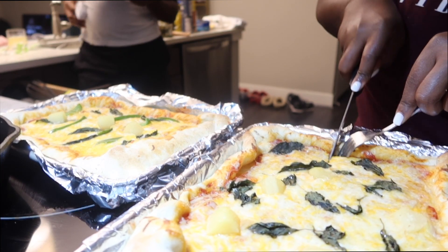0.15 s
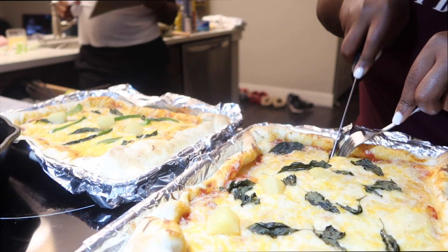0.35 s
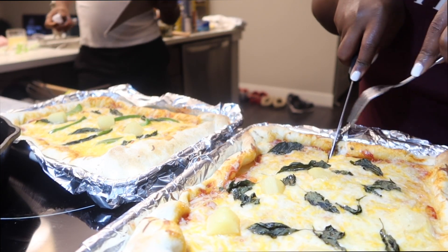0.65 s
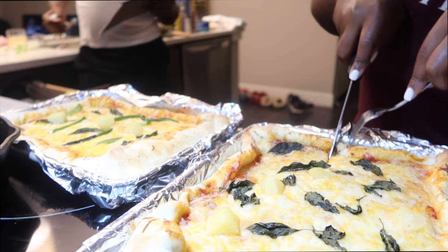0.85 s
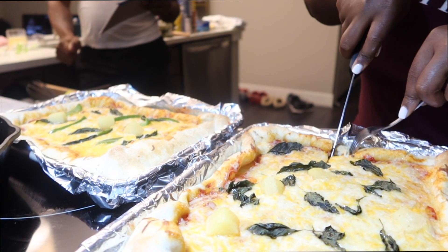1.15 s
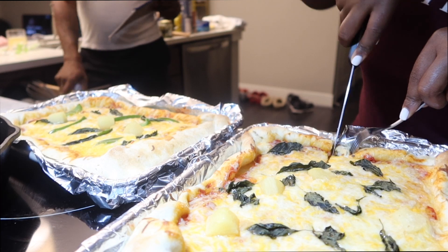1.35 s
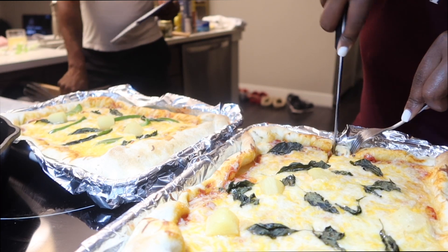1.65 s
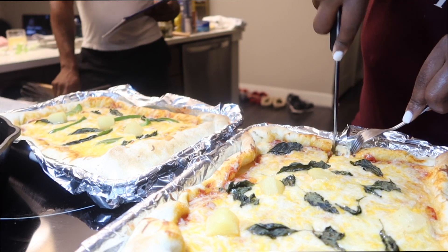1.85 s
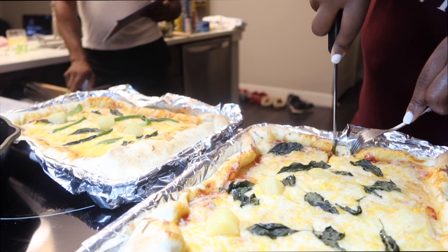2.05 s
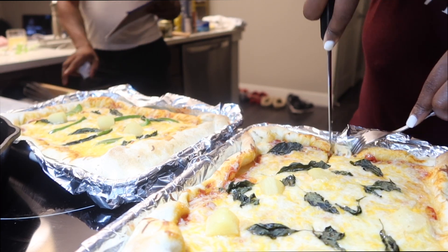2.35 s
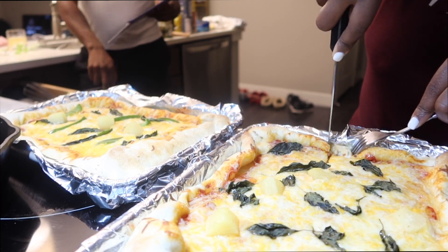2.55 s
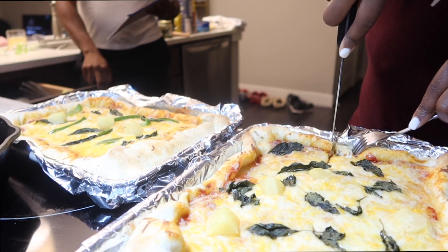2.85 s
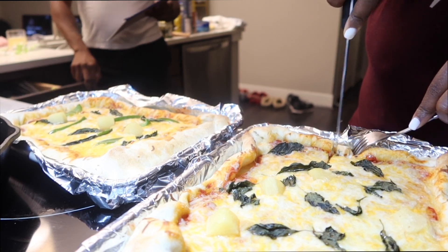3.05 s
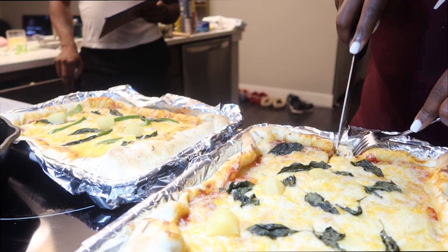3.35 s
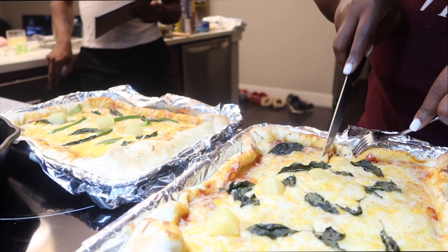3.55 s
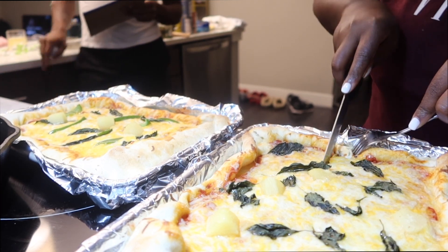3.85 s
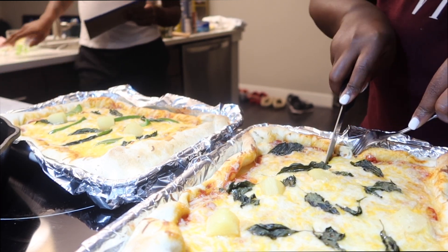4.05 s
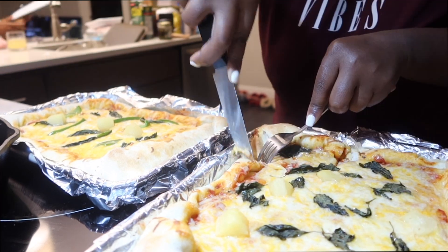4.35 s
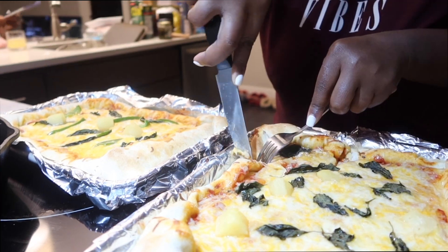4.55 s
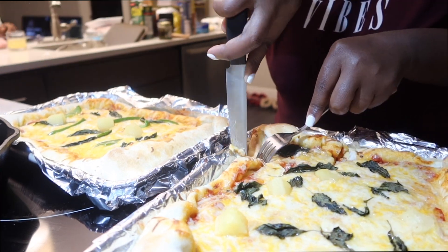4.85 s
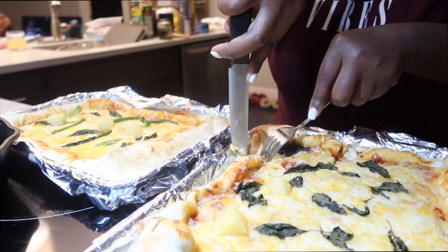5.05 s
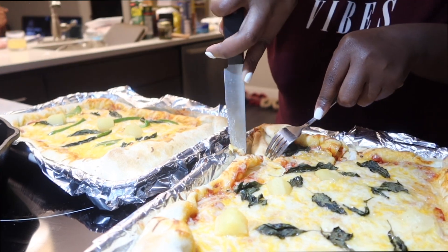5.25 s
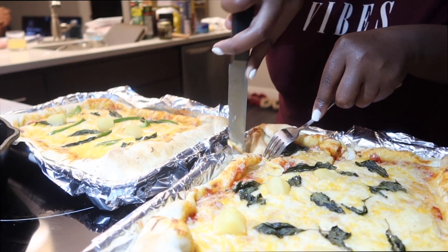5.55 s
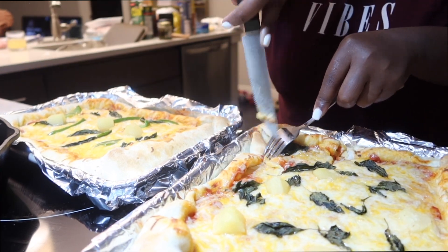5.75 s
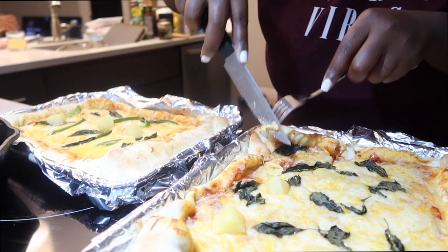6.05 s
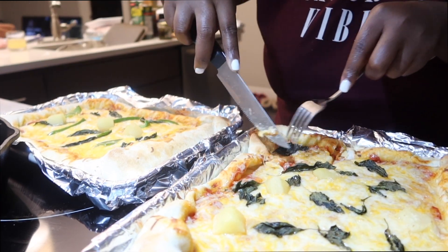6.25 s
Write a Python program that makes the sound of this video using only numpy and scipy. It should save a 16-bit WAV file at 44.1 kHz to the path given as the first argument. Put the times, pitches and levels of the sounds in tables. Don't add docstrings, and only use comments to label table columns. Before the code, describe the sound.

Close foil rustling and sharp snapping with cutlery scrapes and dull metal pan thuds, thinning to sparse clicks over a faint fridge hum.

```python
import sys
import numpy as np
from scipy import signal
from scipy.fft import rfft, irfft, next_fast_len
from scipy.io import wavfile

SR = 44100
rng = np.random.default_rng(int(sys.argv[2]) if len(sys.argv) > 2 else 0)


def invert_db(x):
    u = np.asarray(x, float) / 20
    return 10 ** u


def master_out(mix):
    frames = np.transpose(np.atleast_2d(mix))
    ceiling = np.clip(frames, -1, 1)
    pcm = np.round(ceiling * 32767).astype(np.int16)
    wavfile.write(sys.argv[1], SR, pcm)


N = 282681

# time [s], rustle level [dB], crispness [dB].
HAND_PRESSURE = [(0.0, -40, -9), (0.27, -26.5, -12.5), (0.5, -32, -13), (0.7, -36, -9.5), (0.9, -43, -3.5),
                 (1.05, -33.5, -11.5), (1.2, -56, -2), (1.5, -42, -10), (2.1, -52, -1), (2.43, -53, -14),
                 (2.6, -44, -8), (2.9, -56, -10), (3.4, -46, -17), (4.7, -53, -11), (5.01, -46.5, -13.5),
                 (5.2, -65, -5), (6.05, -56, -10), (6.41, -80, 8)]
# peak time [s], swell [s], fade [s], level [dB], brightness [dB].
STROKES = [(1.364, 0.029, 0.098, -31, -11.5), (1.51, 0.13, 0.034, -30.5, -23),
           (1.596, 0.026, 0.037, -22.5, -11), (1.724, 0.027, 0.045, -23, -10.5),
           (1.79, 0.011, 0.065, -32.5, -7), (1.951, 0.082, 0.0089, -15, -16.5),
           (2.044, 0.042, 0.013, -16, -17), (3.847, 0.09, 0.24, -27.5, -26), (4.242, 0.072, 0.095, -33, -6),
           (4.297, 0.071, 0.061, -25.5, -16), (4.349, 0.17, 0.006, -35, -9.5),
           (5.645, 0.028, 0.066, -39, -21), (5.693, 0.17, 0.02, -26.5, -15.5), (6.15, 0.21, 0.061, -54, 1)]
# start [s], peak level [dB], pitch [Hz], brightness [dB].
CLICKS = [(.088, -23, 3140, -10), (.111, -20, 4970, -10), (.192, -21, 4530, -17), (.422, -16, 4930, -20),
          (.448, -25, 6100, -15), (.594, -28, 4600, -15), (.607, -20.5, 4500, -15), (.667, -18, 4500, -15),
          (.674, -19, 5050, -15), (.782, -27, 4950, -10), (.798, -24, 5000, -10), (4.809, -38, 5060, -5),
          (6.087, -25, 4070, -14), (6.125, -33, 4900, -7), (6.158, -34, 2940, -12),
          (.153, -10.5, 2500, -25), (.278, -9.5, 2860, -25), (.367, -18, 3450, -10),
          (.431, -6.5, 1970, -15), (.49, -15, 2180, -25), (.537, -31, 1890, -17), (.561, -18, 2400, -20),
          (.61, -19, 2360, -20), (.721, -16, 2350, -20), (.847, -36, 1900, -12), (1.941, -6, 2070, -18),
          (2.045, -10, 2220, -15), (4.217, -28, 3020, 8), (4.352, -31, 2950, 0), (4.787, -29, 1680, -20),
          (5.056, -36, 1900, -20), (5.208, -36.5, 2000, -20), (5.282, -42, 1200, -25),
          (5.583, -32, 1890, 1), (5.65, -23, 2260, -10)]
TICKS = [(.189, -13.5, 2330, -18), (.224, -4.5, 2870, -16), (.802, -13.5, 3020, -23),
         (.907, -8.5, 1100, -33), (1.393, -15, 2020, -24), (1.511, -13, 1850, -28),
         (1.576, -17.5, 1950, -20), (1.593, -14, 2050, -11), (1.725, -12, 1800, -9), (1.745, -18, 2350, -4),
         (1.795, -12, 1850, -27), (1.816, -6, 2240, -28), (1.894, -17, 1900, 12.5), (1.919, -5, 1930, -29),
         (2.022, -17, 1640, -13), (2.17, -6, 2170, -1), (2.359, -25.5, 1530, 1), (2.373, -16.5, 1950, 4),
         (2.396, -20.5, 1960, -3), (2.697, -19.5, 1860, 5), (2.704, -13, 2040, -33),
         (2.747, -24.5, 2070, -29), (4.34, -13.5, 2940, -20), (4.75, -45, 2060, 19.5),
         (5.349, -38.5, 2870, 8), (.783, -20, 2560, -5), (.93, -27, 2490, 19), (1.01, -24, 2500, -16),
         (5.868, -50, 1920, 18), (5.719, -26, 2740, 15)]
POPS = [(.081, -18.5, 1780, -1.5), (.295, -5.5, 1880, -33), (.49, -15, 2270, -29), (.722, -14, 2700, -5),
        (.819, -31, 2840, 15.5), (.872, -18, 1310, -26), (.979, -12.5, 3150, -10),
        (1.034, -15.5, 2770, -27), (1.214, -25, 1530, -17), (1.69, -12.5, 1930, -6.5),
        (1.785, -14, 1940, -22), (1.94, -8, 2100, -17), (2.043, -23, 2600, -22), (2.587, -17, 2220, -3),
        (2.633, -16.5, 2750, -8), (3.819, -27, 1070, 0), (3.846, -14, 2090, -12), (4.181, -20.5, 2540, -7),
        (4.233, -14, 2880, 2), (4.439, -15.5, 1460, -38), (5.118, -26, 2020, -8), (5.129, -21, 3080, 0.5),
        (5.164, -22, 2950, -16), (5.367, -34, 2470, -10), (5.576, -20.5, 2080, -4), (5.599, -26, 2110, -8),
        (5.693, -7.5, 2360, -2), (6.061, -7, 2100, 4.5), (6.11, -24, 2160, -28), (6.139, -33, 2980, -16)]
SNAPS = [(.058, -23, 2410, -19), (.108, -26, 2960, 1), (.156, -15, 2500, -31), (.281, -11, 2700, -32),
         (.413, -5, 2220, -12), (.431, -14.5, 1940, 4), (.466, -14.5, 2380, -1.5), (.611, -15.5, 2300, -3),
         (.666, -16.5, 2440, -4), (.906, -6.5, 1630, -1), (.998, -25, 1530, 8), (1.3, -22, 2000, -3),
         (1.491, -14.5, 1800, -0.5), (1.851, -10.5, 1680, -32), (2.148, -15.5, 1870, -8),
         (2.411, -21, 1940, 1.5), (2.939, -20, 1880, -6), (3.193, -26, 2510, -20), (3.805, -36, 2240, -28),
         (4.424, -45.5, 904, 16), (4.849, -16, 1990, -8), (4.958, -23.5, 1780, -31),
         (5.958, -27.5, 1960, -6)]
CRUMPLES = [(.561, -13.5, 2440, -30), (.578, -12, 2740, -5.5), (.683, -12, 3080, -18), (.949, -25, 2680, 6),
            (1.128, -16, 1600, -11), (1.231, -27.5, 3130, 8), (1.255, -11.5, 1700, -14),
            (1.352, -10, 1620, -41), (2.562, -17, 1970, -4.5), (2.918, -21.5, 2110, 0),
            (2.977, -24.5, 1410, -35), (3.262, -24, 2460, -20), (3.29, -29, 3020, -26),
            (3.418, -25.5, 1690, -2.5), (3.491, -25, 1700, -33), (4.575, -23.5, 2100, -14),
            (4.766, -28, 2060, -27), (4.777, -22.5, 1680, -23), (4.928, -23.5, 710, -13),
            (5.634, -17.5, 2200, -1)]
# frequency [Hz], density [dB per Hz].
FOIL_COLOUR = [(350, -25), (600, -20), (675, -22.5), (1310, -5.5), (1710, -6.5), (1980, -1.5), (2840, -2.5),
               (4110, -10), (6200, -25.5), (8060, -32), (13600, -120)]
# frequency [Hz], density [dB per Hz].
SHEEN_COLOUR = [(2650, -3.5), (4500, -4), (8330, -6), (10200, -6.5), (12600, -8), (15300, -17.5),
                (16200, -30)]
# frequency [Hz], width [Hz], level [dB].
STEEL_MODES = [(5184, 37, 22.5), (5750, 60, 23), (6425, 160, 22.5), (8610, 190, 17), (9640, 120, 9.5),
               (11670, 110, -2.5), (13300, 68, -8), (14900, 92, -11)]
# start [s], peak level [dB], overtone share [dB].
BLOWS = [(0.188, -14.5, -13.5), (0.416, -13.5, -10.5), (.573, -28.5, -12), (.869, -29, -12),
         (.902, -35, -1), (1.139, -19, -13.5), (1.365, -12, -15), (1.592, -14.5, -17), (1.667, -21.5, -5.5),
         (1.813, -3, -11.5), (1.85, -21, -8), (2.041, -2.5, -7), (2.691, -24.5, -16), (2.74, -18.5, -10.5),
         (2.789, -28, -15), (2.917, -26, -23), (2.972, -23.5, -40), (3.014, -22, -31), (3.056, -22, -20),
         (3.615, -17, -15.5), (3.711, -21, -12), (3.824, -13, -9.5), (3.859, -22, -8), (3.914, -18, -14),
         (4.435, -8, -5), (4.856, -28, -14), (5.369, -19, -24), (5.632, -24.5, -34), (5.717, -37.5, -3),
         (6.056, -21, -18)]
# frequency [Hz], level [dB], relative ring time [ratio].
PAN_MODES = [(129.7, -8.5, 3.7), (167.5, -13, 3.6), (189.3, 1.5, 1.97), (221, -1, 1.16), (260.5, 4.5, 0.68),
             (360, -2.5, 1.38), (441.4, 1.5, 0.77), (553, -14, 0.28), (606, -3, 0.52), (756, -10.5, 0.81),
             (883, -8, 0.52), (1120, -22, 0.67), (1300, -8, 0.34), (1570, -17, 0.36)]
# frequency [Hz], density [dB per Hz].
RATTLE_COLOUR = [(150, -8), (400, 10.5), (900, -9.5), (3500, -30.5), (8000, -88)]
# time [s], drag level [dB].
PUSH = [(0.0, -42.5), (0.5, -42.5), (0.72, -63), (1.05, -44), (1.7, -37), (2.15, -35), (2.43, -51),
        (2.78, -34), (2.94, -41), (3.4, -30), (3.8, -31.5), (3.87, -17.5), (4.12, -46.5), (4.63, -43.5),
        (4.79, -52.5), (5.01, -44.5), (5.18, -53), (6.41, -53.5)]
# frequency [Hz], density [dB per Hz].
DRAG_COLOUR = [(53, -33), (90, -10), (166, 5.5), (208, 2), (263, -10.5), (340, -3), (426, -4), (473, -2),
               (514, -7), (666, -10), (732, -11), (1030, -18), (1500, -19), (1950, -19.5), (3300, -120)]
# start [s], peak level [dB], pitch [Hz].
BUMPS = [
    (.196, -28, 46.5),
    (2.731, -30.5, 47.3),
    (3.823, -2.5, 45),
    (3.921, -9, 47.4),
    (4.021, -24.5, 45.5),
    (5.65, -49, 70),
    (6.067, -30, 54.7),
    (6.11, -28, 73.4),
    (6.261, -35, 57.6),
]
# frequency [Hz], density [dB per Hz].
AIR_COLOUR = [(15, -35), (25, -36), (114, -11), (166, -11), (416, -20.5), (476, -27), (887, -25),
              (1190, -18.5), (1290, -21), (2840, -21), (8140, -35.5), (13200, -52), (16000, -61)]
# frequency [Hz], their difference against their sum [dB].
PORT_DIFFERENCE = [(60, -56), (110, -24), (200, -21), (380, -11.5), (700, -13), (1290, -20), (2380, -23),
                   (4400, -2.5), (8120, 0), (15000, 4.5)]


def rms_one(x):
    return x / np.sqrt(np.mean(x ** 2) + 1e-20)


def dying(t, t60):
    return invert_db(-60 * t / t60)


def onset(t, rise_s):
    return 1 - np.exp(-t / rise_s)


def place(out, start, sound):
    out[start:][:len(sound)] += sound


def in_time(rows):
    s, *columns = np.transpose(rows)
    return [np.interp(np.arange(N) / SR, s, column) for column in columns]


def butter(x, order, hz, kind):
    return signal.sosfilt(signal.butter(order, hz, kind, fs=SR, output="sos"), x)


def coloured(x, spectrum):
    size = next_fast_len(len(x) + 4096)
    hz, db = np.transpose(spectrum)
    bins = np.arange(size // 2 + 1) * SR / size + 1
    gain = invert_db(np.interp(np.log(bins), np.log(hz), db))
    return irfft(rfft(x, size) * gain, size)[:len(x)]


def ring(clicks, hz, t60):
    r, w = invert_db(-60 / (t60 * SR)), 2 * np.pi * hz / SR
    return signal.lfilter([0, np.sin(w)], [1, -2 * r * np.cos(w), r * r], clicks + 1e-18)


def crackle(per_s, spread_db):
    sizes = invert_db(spread_db * np.minimum(rng.exponential(1, N), 4)) * rng.choice([-1, 1], N)
    return rms_one(sizes * (rng.random(N) < per_s / SR))


def flutter(rate, depth_db):
    steps = rng.standard_normal(1000)
    return invert_db(depth_db * np.interp(np.arange(N) * rate / SR, np.arange(len(steps)), steps))


def foil(body, sheen, per_s, spread_db, cycles):
    grains = crackle(per_s, spread_db)
    patch_of = rng.integers(0, 18, N)
    sheet = np.zeros(N)
    for k, hz in enumerate(np.geomspace(450, 5600, 18)):
        sheet += ring(grains * (patch_of == k), hz, cycles / hz) * np.sqrt(hz)
    bright = rms_one(coloured(grains, SHEEN_COLOUR))
    steel = sum(invert_db(db) * rms_one(ring(grains, hz, 1.95 / width)) for hz, width, db in STEEL_MODES)
    return body * rms_one(coloured(sheet, FOIL_COLOUR)) + sheen * rms_one(bright + 0.27 * rms_one(steel))


def rustle():
    rustle_db, crisp_db = in_time(HAND_PRESSURE)
    body = flutter(35, depth_db=2.5) * invert_db(rustle_db)
    sheen = flutter(120, depth_db=1.0) * invert_db(rustle_db + crisp_db)
    return foil(body, sheen, per_s=1500, spread_db=1.0, cycles=27.5)


def strokes():
    range_db, rounding = 39, 1.35
    body, sheen, t = np.zeros(N), np.zeros(N), np.arange(N) / SR
    for s, swell, fade, level_db, bright_db in STROKES:
        away = np.where(t < s, (s - t) / swell, (t - s) / fade)
        gain = (away < 1) * invert_db(level_db - range_db * np.minimum(away, 1) ** rounding)
        body += gain
        sheen += gain * invert_db(bright_db + 8.5)
    uneven = flutter(90, depth_db=1.07)
    return foil(body * uneven, sheen * uneven, per_s=12000, spread_db=2.5, cycles=10.6)


def snaps():
    kinds = [(TICKS, 0.023), (POPS, 0.052), (SNAPS, 0.077), (CRUMPLES, 0.12), (CLICKS, 0.013)]
    edge_share = 0.88
    out, t = np.zeros(N + 4410), np.arange(4410) / SR
    for rows, t60 in kinds:
        burst = dying(t, t60) * onset(t, 0.043 * t60)
        edge = dying(t, t60 / (1 / edge_share - 1))
        ping_share = 2.07 * (0.06 / t60) ** 0.44
        for s, peak_db, hz, bright_db in rows:
            clumps = invert_db(4.0 * np.repeat(rng.standard_normal(70), 63))
            grains = clumps * rng.standard_normal(len(t))
            sheen = invert_db(bright_db + 2) * edge * rms_one(coloured(grains, SHEEN_COLOUR))
            broad = rms_one(coloured(grains, FOIL_COLOUR)) + sheen
            pitched = rms_one(ring(rng.standard_normal(len(t)), hz, 11.7 / hz))
            ping = np.sin(2 * np.pi * hz * t) * dying(t, 16.9 / hz) * onset(t, 0.00025) * ping_share
            snap = burst * (0.42 * broad + 0.7 * pitched) + ping
            place(out, round(s * SR), invert_db(peak_db - 7.0) * snap)
    return out[:N]


def foil_sheet():
    lift_s, lift_db = 4.7, -1.5
    sheet = rustle() + strokes() + snaps()
    treble = butter(sheet, 2, 10500, "high")
    return sheet + (np.arange(N) > lift_s * SR) * invert_db(lift_db) * treble


def blows():
    blow_t60_s, softer_longer = 0.076, 0.0061
    rattle_db, rattle_t60_s = -14.5, 0.11
    strike_spread_db = 1.0
    out, t = np.zeros(N + 23000), np.arange(22050) / SR
    rattle = rms_one(coloured(rng.standard_normal(N + len(t)), RATTLE_COLOUR))
    for s, peak_db, overtone_db in BLOWS:
        start = round(s * SR)
        shake = invert_db(peak_db + overtone_db + 13 + rattle_db) * dying(t, rattle_t60_s) * onset(t, 0.0011)
        place(out, start + 120, shake * rattle[start:][:len(t)])
        t60 = blow_t60_s * (1 - softer_longer * peak_db)
        for hz, db, longer in PAN_MODES:
            louder, off = rng.standard_normal(2)
            overtone = (hz > 240) * (overtone_db + 11)
            gain = invert_db(peak_db + db - 7.5 + strike_spread_db * louder + overtone)
            tone = np.sin(2 * np.pi * hz * (1 + 0.022 * off) * t)
            place(out, start + 120, gain * dying(t, t60 * longer) * onset(t, 0.0017) * tone)
    return butter(out[:N], 2, 97, "high")


def drag(drag_db):
    sing_s, sing_width_s, sing_hz, sing_t60_s, sing_db = 3.35, 0.22, 345, 0.14, -5.5
    rub = rng.standard_normal(N)
    modes = sum(invert_db(db) * rms_one(ring(rub, hz, 0.3 * longer)) for hz, db, longer in PAN_MODES)
    singing = np.exp(-((np.arange(N) / SR - sing_s) / sing_width_s) ** 4)
    sing = invert_db(sing_db) * singing * rms_one(ring(rub, sing_hz, sing_t60_s))
    friction = rms_one(coloured(rub, DRAG_COLOUR))
    return invert_db(drag_db) * rms_one(friction + 0.27 * rms_one(modes) + sing)


def bumps():
    out, t = np.zeros(N + 22050), np.arange(22050) / SR
    for s, peak_db, hz in BUMPS:
        swing = np.sin(2 * np.pi * hz * (t + 0.013 * onset(t, 0.0056)))
        place(out, round(s * SR), invert_db(peak_db) * dying(t, 0.23) * onset(t, 0.0041) * swing)
    return out[:N]


def rumble(drag_db):
    level_db, follows = -49.5, 0.67
    tremble = rms_one(butter(rng.standard_normal(N), 2, [35, 95], "band"))
    return invert_db(level_db + follows * (drag_db - drag_db.mean())) * tremble


def echo(x, t60):
    t = np.arange(22050) / SR
    tail = rng.standard_normal(len(t)) * dying(t, t60)
    return signal.fftconvolve(x, tail / np.sqrt(np.sum(tail ** 2)))[:N]


def room(x):
    return invert_db(-9.5) * coloured(echo(x, 0.23), [(300, -6.0), (3000, 0.5), (12000, -7)])


def fridge():
    return invert_db(-49.5) * flutter(5.0, depth_db=6.0) * np.sin(2 * np.pi * 119 * np.arange(N) / SR)


def air():
    return invert_db(-54.5) * rms_one(coloured(rng.standard_normal(N), AIR_COLOUR))


def ports(mid):
    turned = np.imag(signal.hilbert(mid, next_fast_len(N)))[:N]
    louder_right = coloured(mid, [(1000, 1), (3000, -33)])
    shifting = rms_one(ring(rng.standard_normal(N), 56, 0.0067))
    difference = 0.52 * turned - 0.25 * louder_right + 0.28 * echo(mid, 0.1) + 0.66 * shifting * mid
    side = coloured(difference, PORT_DIFFERENCE)
    return np.array([mid + side, mid - side])


def scene():
    drag_db, = in_time(PUSH)
    sheet, knocks = foil_sheet(), blows()
    near = sheet + knocks + drag(drag_db) + bumps() + rumble(drag_db)
    return ports(near + room(sheet + 1.66 * knocks) + fridge() + air())


def band_limit(x):
    return signal.sosfilt(signal.butter(12, 16480, fs=SR, output="sos"), x)


def record(dry):
    rounded = 1.1 * np.tanh(dry / 1.1)
    top_cut = signal.sosfilt(signal.cheby2(12, 70, 16500, fs=SR, output="sos"), rounded)
    mix = butter(top_cut, 4, 32, "high")
    return band_limit(mix)


dry = scene()
out = record(dry)
master_out(out)
```